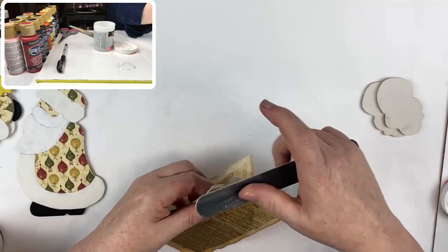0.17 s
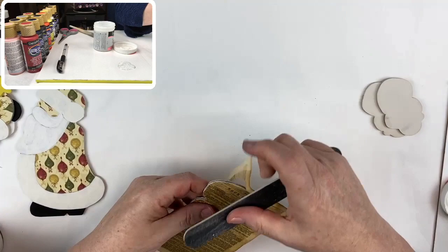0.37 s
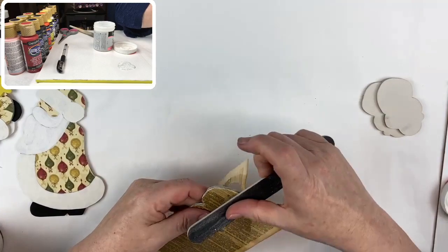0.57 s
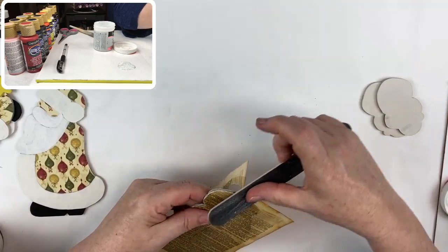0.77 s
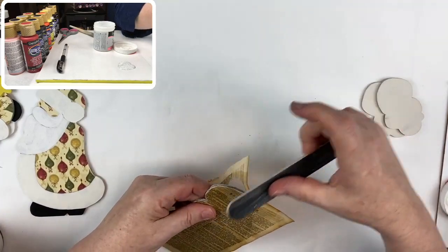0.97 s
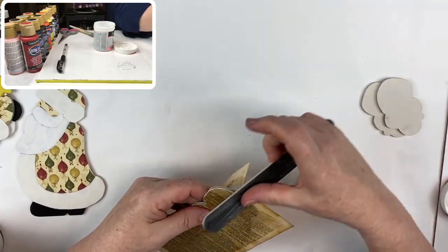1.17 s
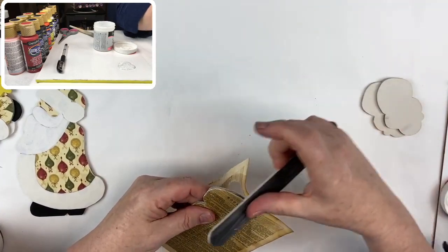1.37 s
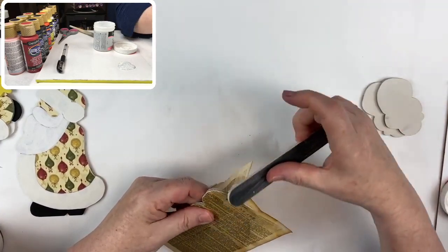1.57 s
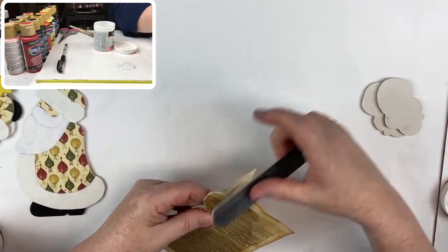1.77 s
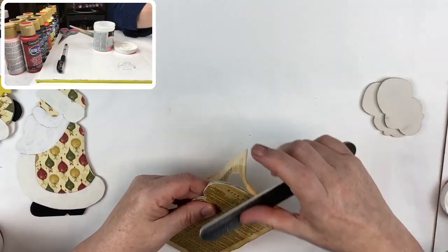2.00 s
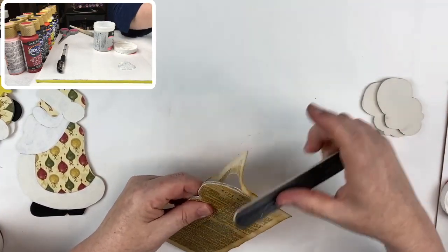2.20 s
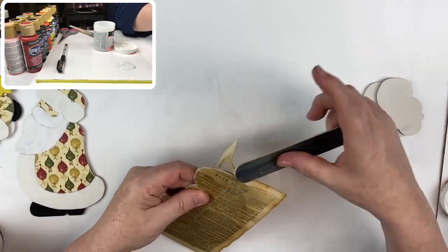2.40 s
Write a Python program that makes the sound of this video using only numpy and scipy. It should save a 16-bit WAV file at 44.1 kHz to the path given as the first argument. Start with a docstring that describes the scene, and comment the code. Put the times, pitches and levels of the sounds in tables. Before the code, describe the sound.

An emery board sands a papered wooden edge, close and dry. Until about 0.5 s fingers rub softly on the board. Light hollow knocks cluster at 0.66-0.84 s, then short gritty rasps come near 0.85-1.03, 1.3, 1.6, 1.9 and 2.2 s, the last brighter after a faint return scrape. Small sharp knocks end it at 2.43 s, over quiet room tone and faint electrical ticks.

```python
"""Fingers slide softly along an emery board, a hollow rub under a high swish, as they settle their grip.
Then the board taps down and sands the paper edge of a hand-held wooden ornament in five short strokes.
In each stroke the edge catches and shakes the wood, coarse grains rasp and fine ones hiss: random tiny
impacts, filtered. Knocks are decaying sines; a light return scrape comes before the last stroke.
Behind it lie a short room tail, steady room tone and faint electrical ticks."""
import sys
import numpy as np
from scipy import signal
from scipy.io import wavfile
from scipy.ndimage import uniform_filter1d

SR = 44100
rng = np.random.default_rng(int(sys.argv[2]) if len(sys.argv) > 2 else 0)


def dump(signal):
    """Clip the signal to [-1, 1] and save it as 16-bit WAV at the path in sys.argv[1]."""
    limited = np.clip(np.atleast_2d(signal).T, -1, 1)
    pcm = np.round(limited * 32767).astype(np.int16)
    wavfile.write(sys.argv[1], SR, pcm)


N = 108000  # length in samples

# one curve per stroke, levels ahead of the side-edge colour: (t/s, thrum level/dB, rasp level/dB, hiss level/dB)
STROKE_CURVES = [
    [(.828, -51, -63, -64), (.858, -43, -47.5, -54), (.882, -39.5, -41, -50.5), (.905, -34.5, -43.5, -54),
     (.925, -44, -49.5, -56), (.965, -42.5, -53, -56), (1.016, -37.5, -44, -58.5), (1.036, -69, -67, -69)],
    [(1.272, -64, -68, -78), (1.295, -38.5, -50, -54.5), (1.325, -35.5, -37.5, -48),
     (1.36, -35, -35.5, -49.5), (1.382, -34.5, -40.5, -50.5), (1.39, -40.5, -51, -55),
     (1.42, -57, -76, -67)],
    [(1.586, -56, -65, -57), (1.598, -39.5, -48, -51), (1.625, -35.5, -45.5, -50),
     (1.66, -35.5, -36.5, -51), (1.688, -36.5, -45.5, -54), (1.71, -62, -54, -73)],
    [(1.871, -58, -58, -64), (1.884, -34.5, -40.5, -49), (1.905, -37, -39, -46.5),
     (1.927, -39.5, -35.5, -50), (1.944, -39.5, -35, -42.5), (1.959, -32.5, -40, -47.5),
     (1.964, -62, -54, -61), (1.99, -63, -69, -73)],
    [(2.176, -54, -62, -78), (2.194, -48.5, -56.5, -59), (2.212, -37, -41, -51.5),
     (2.245, -34.5, -37.5, -49), (2.265, -37.5, -39, -50.5), (2.282, -31.5, -38.5, -58),
     (2.297, -43, -44, -65), (2.31, -52, -54, -72)],
]
# how each stroke meets the wood: (resonance f/Hz, width f/Hz, place 0 upper edge to 1 side edge, bite level/dB)
STROKE_CONTACTS = [(718, 300, .05, -8), (747, 280, 0.044, -12), (725, 250, 0.045, -13), (706, 200, 0.15, 0),
                   (793, 380, 1, -18)]
# shaken wood: (f/Hz, level/dB)
THRUM_COLOUR = [(30, -55), (100, -9.5), (170, -6.5), (260, -2.5), (380, -7.5), (480, -5.5), (580, -0.5),
                (740, 0), (900, -3.5), (1050, -13.5), (1300, 0), (2500, -36), (8000, -58)]
# coarse grit: (f/Hz, level/dB)
RASP_COLOUR = [(200, -21), (800, 11), (1080, -3.5), (1400, 1), (1650, -7), (2200, -8), (2700, -5.5),
               (3500, -15), (4650, -15), (5300, -20.5), (6400, -42), (15000, -39)]
# fine grit: (f/Hz, level/dB)
HISS_COLOUR = [(500, -2), (4000, 1.5), (4700, 1.5), (5200, -13.5), (5700, -2.5), (6300, -6.5), (7000, 3),
               (7900, -4.5), (8800, -1.5), (9600, -9.5), (10500, -6.5), (11000, -14.5), (11700, -9),
               (13000, -17.5), (15500, -22)]
# narrow resonances of board and ornament inside the rasp: (f/Hz, width f/Hz, level over the grit/dB)
BOARD_MODES = [(1342, 40, -21.5), (1463, 24, 2.5), (1803, 110, -2.5), (2137, 100, -10), (2450, 32, -34),
               (2664, 80, -6), (3820, 14, 8), (4650, 280, 1.5)]
# colour the side edge adds, in proportion to the stroke's place: (f/Hz, level/dB)
SIDE_EDGE_COLOUR = [(300, -0.5), (450, 4.5), (700, -4.5), (1060, 6.5), (1300, -2.5), (1600, 2), (1800, -1),
                    (2200, 2.5), (2700, -2.5), (3100, 4), (4150, 5.5), (4650, -5.5), (5400, 2),
                    (7000, -4.5), (7800, 5.5), (8800, 1.5), (9500, 8.5), (10200, -3), (11700, -3),
                    (15000, 1)]
CATCHES_PER_S, CATCH_SPREAD_DB = 1100, 5
COARSE_PER_S, COARSE_SPREAD_DB = 5000, 5.5
FINE_PER_S, FINE_SPREAD_DB = 14000, 6
CATCH_IN_RASP = 0.38  # gain: each catch also snaps grains loose
BITE_HZ, BITE_WIDTH_HZ = 2400, 1800  # the paper's edge buzzes here when the grit bites into it

# board knocks on the edge: (t/s, knock level/dB, pitch f/Hz, tick peak level/dB, scuff level/dB)
TAPS = [(.399, -46.5, 650, -59, -64), (.6637, -24.5, 716, -66, -50.5), (0.713, -33.5, 696, -55, -51),
        (0.7339, -30, 740, -50, -49.5), (0.7488, -32.5, 690, -53, -50.5), (0.8192, -26, 760, -52, -48.5),
        (.834, -32.5, 736, -44, -63), (0.8399, -25.5, 750, -41, -68), (0.987, -37, 725, -61, -79),
        (1.217, -51, 670, -65, -73), (1.2469, -28, 670, -47.5, -54.5), (1.5556, -29.5, 650, -50, -60.5),
        (1.840, -37, 690, -47, -55), (1.969, -53, 970, -28, -45), (2.002, -40, 755, -44.5, -56),
        (2.0216, -48, 760, -48, -79), (2.17, -18, 740, -32.5, -42.5), (2.4244, -56, 890, -36, -45),
        (2.4285, -27, 910, -37, -46), (2.441, -18.5, 747, -31, -45)]
# modes of one knock: (multiple of its pitch, level/dB, time to fall 60 dB t/s)
KNOCK_MODES = [(.43, -9.5, 0.014), (1, -2.5, 0.013), (1.45, -8.5, 0.0082)]
# dry tick of a knock: (f/Hz, level/dB)
TICK_COLOUR = [(100, -4), (900, -7), (1600, 9.5), (2900, 8), (4200, -8), (5600, -73), (8000, -47),
               (15500, -63)]
# grit skidding around a knock: (f/Hz, level/dB)
SCUFF_COLOUR = [(100, 0), (320, -1), (500, -10.5), (750, 7.5), (1200, 3.5), (1700, -3), (3000, -7.5),
                (5500, -18.5), (8500, -16), (15500, -31.5)]
CONTACT_S = 0.00025  # the soft board presses in with this time constant
SCUFF_RISE_S, SCUFF_FALL_S = 0.0023, 0.0048
THUD_HZ, THUD_T60_S, THUD_DB = 48.4, 0.26, -30.5  # each knock nudges the table; level relative to the knock

# light drag of the board on its way back: (t/s, level/dB)
RETURN_LEVELS = [(1.96, -68), (1.99, -56.5), (2.03, -63.5), (2.082, -61.5), (2.10, -66), (2.15, -61),
                 (2.18, -57)]
# light drag: (f/Hz, level/dB)
DRAG_COLOUR = [(100, -31), (300, 4), (450, -6), (620, 11), (900, -5), (1300, -6), (1900, -1.5), (2500, -13),
               (3500, -26), (6000, -23.5), (15000, -47)]

# longer ring of the wooden ornament: (f/Hz, width f/Hz, level/dB)
RING_MODES = [(377, 13, -23), (708, 22, -9.5), (900, 5.1, -17), (1080, 9.1, -6), (1320, 8.3, -4),
              (1466, 17, -15.5), (1805, 20, -1.5), (2225, 26, 0.5)]

# finger slides: (peak t/s, rise t/s, fall t/s, rub level/dB, swish level/dB, pitch factor as the grip moves)
SLIDES = [(.005, 0.013, 0.037, -53, -71, 1.02), (.138, 0.042, 0.0094, -58.5, -69.5, 1.01),
          (0.19, 0.026, 0.023, -50, -65, 1), (0.241, 0.013, 0.027, -59, -70, 1),
          (.328, 0.029, 0.022, -59, -65.5, 0.986), (0.491, 0.066, 0.036, -72.5, -65.5, 0.92)]
# hollow rub of skin on the board: (f/Hz, level/dB)
SKIN_COLOUR = [(100, -11), (450, -5.5), (720, 4), (1100, -8.5), (1500, -1), (1800, -8), (2100, -1),
               (2350, -5.5), (2800, 7), (3400, -11), (3950, -4.5), (4200, -10), (4700, -3), (5600, -16),
               (6100, -20), (7000, -22), (15000, -27)]
# high swish of the slide: (f/Hz, level/dB)
SWISH_COLOUR = [(500, -22), (2000, 2), (4400, 1.5), (5400, -6), (6100, 5), (7000, -2), (8500, -2.5),
                (10000, -6), (11000, -6), (15500, -13)]

# decay of the room tail: (f/Hz, time to fall 60 dB t/s)
ROOM_T60 = [(100, 0.63), (700, 0.17), (2000, 0.29), (5000, 0.1), (15000, 0.083)]
# tone of the room tail: (f/Hz, level/dB)
ROOM_COLOUR = [(100, 2.5), (700, -5), (2000, -3.5), (5000, -9.5), (15000, -37)]
ROOM_DB = -14
# room tone: (f/Hz, level/dB)
FLOOR_COLOUR = [(20, 1), (50, 0), (85, -8), (170, -12), (400, -19.5), (720, -23), (1200, -24.5),
                (4000, -30), (9000, -35.5), (15500, -40.5)]
FLOOR_DB = -63.5

# electrical ticks: (f/Hz, level/dB)
MAINS_COLOUR = [(300, -8), (3000, -1.5), (5500, 8.5), (7200, -1), (9000, 4), (10800, -4), (12500, 2.5),
                (15500, -9.5)]
MAINS_HZ, MAINS_FIRST_S, MAINS_DB = 59.934, .0024, -48
CUTOFF_HZ = 15750


def sanding():
    """Catches of the edge shake the wood; coarse grit rasps through the board; fine grit hisses."""
    t, out = np.arange(N) / SR, np.zeros(N)
    catches = grains(CATCHES_PER_S, CATCH_SPREAD_DB)
    push = colour(catches, THRUM_COLOUR)
    coarse = grains(COARSE_PER_S, COARSE_SPREAD_DB) + CATCH_IN_RASP * catches
    rasp = colour(coarse + modes(coarse, BOARD_MODES), RASP_COLOUR)
    hiss = colour(grains(FINE_PER_S, FINE_SPREAD_DB), HISS_COLOUR)
    for curve, (wood_hz, wood_width, place, bite_db) in zip(STROKE_CURVES, STROKE_CONTACTS):
        times, *levels = np.transpose(curve)
        on = (t >= times[0]) & (t < times[-1])
        thrum = steady(resonate(push, wood_hz, wood_width)[on])
        bite = amp(bite_db) * resonate(rasp[on], BITE_HZ, BITE_WIDTH_HZ)
        layers = thrum, unit(rasp[on] + bite), unit(hiss[on])
        stroke = sum(layer * amp(np.interp(t[on], times, db)) for layer, db in zip(layers, levels))
        edge = response([(hz, place * db) for hz, db in SIDE_EDGE_COLOUR])
        add(out, times[0], signal.fftconvolve(stroke, edge))
    return out


def steady(x, size=900):
    """The hand's pressure holds the vibration near rms 1 over a sliding window (size in samples)."""
    return x / np.sqrt(uniform_filter1d(x ** 2, size) + 1e-12)


def taps():
    """The board meets the edge: a hand-damped knock, a dry tick, a skid of grit and a faint table thud."""
    t, clock, out = np.arange(SR // 5) / SR, np.arange(N) / SR, np.zeros(N)
    tick = response(TICK_COLOUR)
    tick = tick / abs(tick).max()
    grit = colour(grains(COARSE_PER_S, COARSE_SPREAD_DB), SCUFF_COLOUR)
    thud = amp(THUD_DB) * decaying_sine(t, THUD_HZ, THUD_T60_S)
    press = 1 - np.exp(-t / CONTACT_S)
    for s, knock_db, pitch_hz, tick_db, scuff_db in TAPS:
        knock = np.zeros(len(t))
        for k, (ratio, db, t60) in enumerate(KNOCK_MODES):
            # neighbouring modes swing against each other
            knock += (-1) ** k * amp(db) * decaying_sine(t, pitch_hz * ratio, t60)
        add(out, s, amp(knock_db) * press * (knock - thud))
        time_constant = np.where(clock < s, SCUFF_RISE_S, SCUFF_FALL_S)
        out += amp(scuff_db) * grit * np.exp(-np.minimum(abs(clock - s) / time_constant, 20))
        add(out, s, -amp(tick_db) * tick)
    return out


def decaying_sine(t, hz, t60):
    """A struck mode: a sine that falls 60 dB in t60 seconds."""
    return np.exp(-np.log(1000) * t / t60) * np.sin(2 * np.pi * hz * t)


def return_drag():
    """The board barely touches the paper as it comes back: sparse grains make a light uneven scrape."""
    times, db = np.transpose(RETURN_LEVELS)
    level = np.interp(np.arange(N) / SR, times, db, left=-np.inf, right=-np.inf)  # silent outside
    return colour(grains(1500, 3.5), DRAG_COLOUR) * amp(level)


def ring(contact):
    """The ornament hums on briefly after each contact, through its narrow resonances."""
    return modes(contact, RING_MODES)


def fingers():
    """Skin brushes the board in soft swells: a hollow rub and a high swish."""
    t, out = np.arange(N) / SR, np.zeros(N)
    friction = grains(9000, 6.1)
    swish = colour(grains(FINE_PER_S, FINE_SPREAD_DB), SWISH_COLOUR)
    for s, rise, fall, rub_db, swish_db, pitch in SLIDES:
        swell = np.exp(-((t - s) / np.where(t < s, rise, fall)) ** 2)
        rub = colour(friction, [(hz * pitch, db) for hz, db in SKIN_COLOUR])
        out += swell * (amp(rub_db) * rub + amp(swish_db) * swish)
    return out


def room(x, size=256):
    """A short diffuse tail of random echoes; each band decays at its own rate, the top treble soonest."""
    t = np.arange(SR // 2) / SR
    echoes = rng.standard_normal(len(t)) * (rng.random(len(t)) < 3000 / SR)  # 3000 per second
    echoes *= t > .004  # first echo after 4 ms
    hz, frame_t, bands = signal.stft(echoes, SR, nperseg=size)
    decay = np.exp(-np.log(1000) * frame_t / read(ROOM_T60, hz)[:, None])
    tail = signal.istft(bands * decay, SR, nperseg=size)[1]
    tail = signal.fftconvolve(tail / np.linalg.norm(tail), response(ROOM_COLOUR))
    return signal.fftconvolve(x, tail)[:N]


def room_tone():
    """Steady coloured noise under everything."""
    return amp(FLOOR_DB) * colour(rng.standard_normal(N), FLOOR_COLOUR)


def mains():
    """Faint electrical interference: one thin tick per mains cycle."""
    ticks = np.zeros(N)
    ticks[(np.arange(MAINS_FIRST_S, N / SR, 1 / MAINS_HZ) * SR).astype(int)] = 1
    shape = response(MAINS_COLOUR)
    return amp(MAINS_DB) * signal.fftconvolve(ticks, shape / np.linalg.norm(shape))[:N]


def amp(db):
    """Decibels to gain."""
    return 10 ** (np.asarray(db) / 20)


def unit(x):
    """Scales to rms 1."""
    return x / np.sqrt(np.mean(x ** 2) + 1e-20)


def read(points, hz):
    """Reads a table on a log-frequency axis."""
    f, value = np.transpose(points)
    return np.interp(np.log(hz + 1), np.log(f), value)


def add(mix, s, sound):
    """Adds a sound to the mix at a time in seconds."""
    part = mix[max(round(s * SR), 0):][:len(sound)]
    part += sound[:len(part)]


def response(points, size=4096):
    """Causal (minimum-phase) impulse response with the given spectrum."""
    log_gain = np.log(amp(read(points, abs(np.fft.fftfreq(size, 1 / SR)))))
    spectrum = np.exp(np.conj(signal.hilbert(log_gain)))
    return np.fft.ifft(spectrum).real[:size // 2]


def colour(x, points):
    """Filters x by a spectrum, at rms 1."""
    return unit(signal.fftconvolve(x, response(points))[:len(x)])


def resonate(x, hz, width):
    """One resonance with a peak gain of 1."""
    return signal.lfilter(*signal.iirpeak(hz, hz / width, SR), x)


def modes(x, table):
    """A bank of resonances side by side, each at its own level."""
    return sum(amp(db) * resonate(x, hz, width) for hz, width, db in table)


def grains(per_s, spread_db):
    """Random tiny impacts of uneven size and either sign, at rms 1."""
    hit = rng.random(N) < per_s / SR
    sign = rng.choice([-1, 1], N)
    size_db = spread_db * np.clip(rng.standard_normal(N), -2, 2)
    return unit(hit * sign * amp(size_db))


def scene():
    """Close handwork, its room tail and the room tone."""
    contact = sanding() + taps() + return_drag()
    work = contact + ring(contact) + fingers()
    return (work + amp(ROOM_DB) * room(work) + room_tone())[None]


def record(dry):
    """Adds the mains ticks, then a steep low-pass limits the band."""
    low_pass = signal.firwin(511, CUTOFF_HZ, window=("kaiser", 9), fs=SR)
    return signal.oaconvolve(dry + mains(), low_pass[None], "same")


dry = scene()
out = record(dry)
dump(out)
```